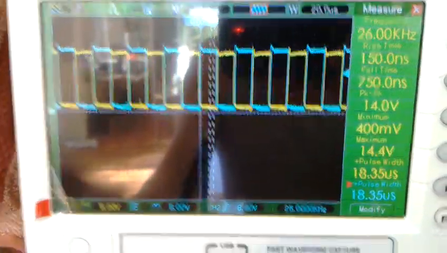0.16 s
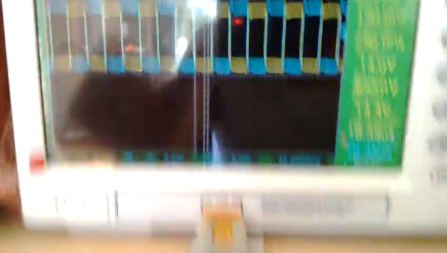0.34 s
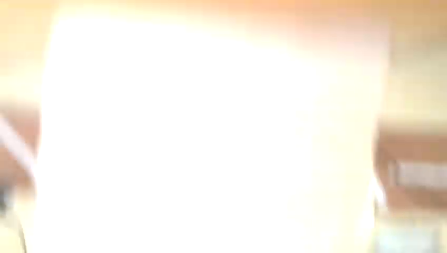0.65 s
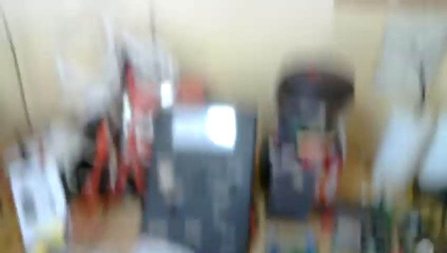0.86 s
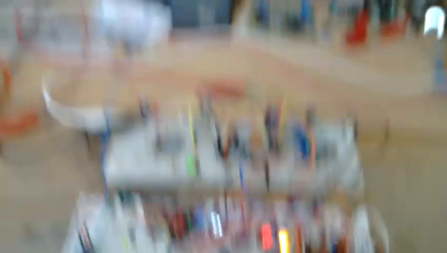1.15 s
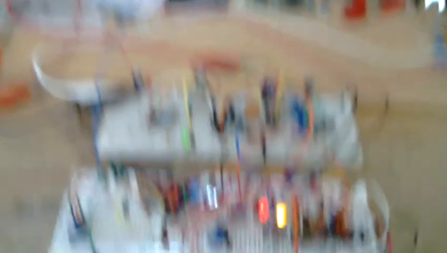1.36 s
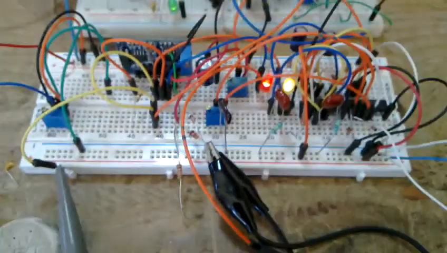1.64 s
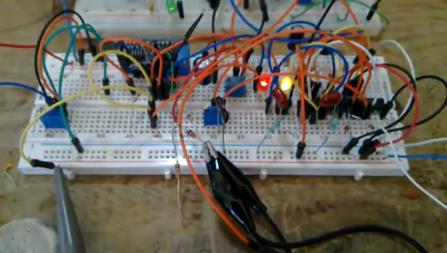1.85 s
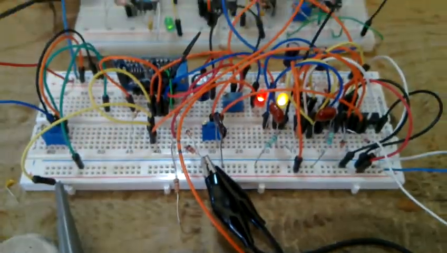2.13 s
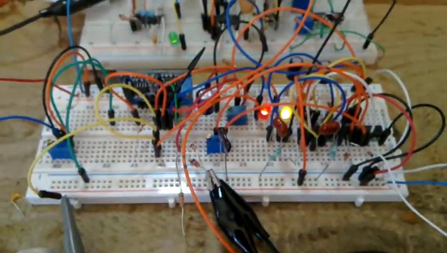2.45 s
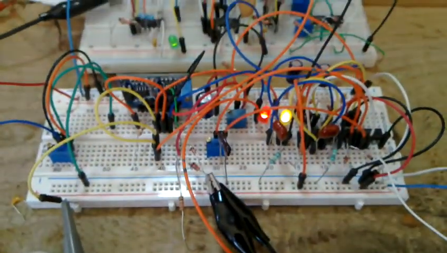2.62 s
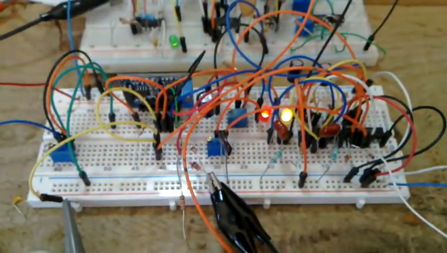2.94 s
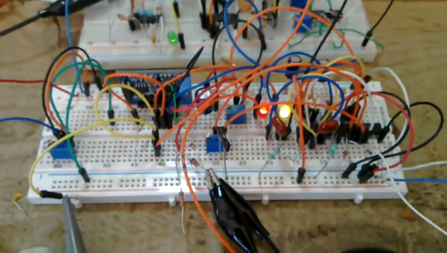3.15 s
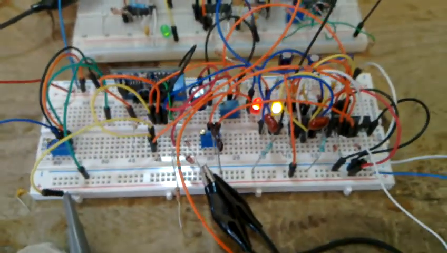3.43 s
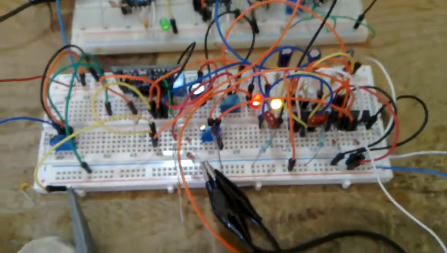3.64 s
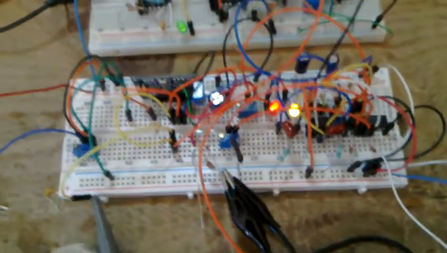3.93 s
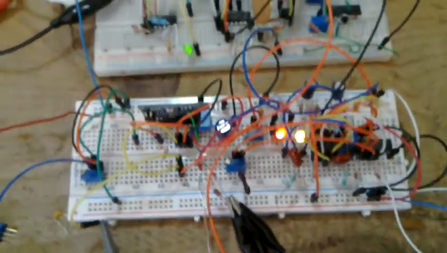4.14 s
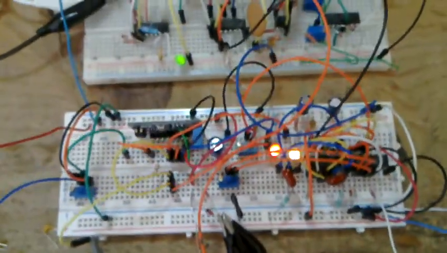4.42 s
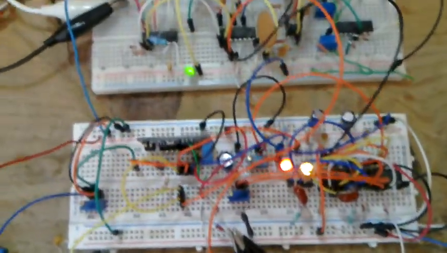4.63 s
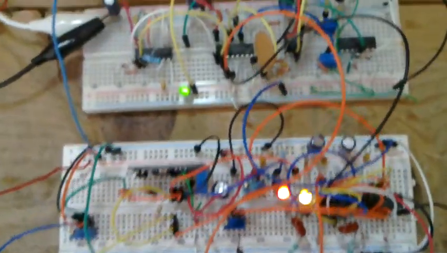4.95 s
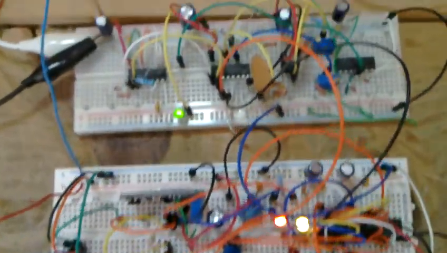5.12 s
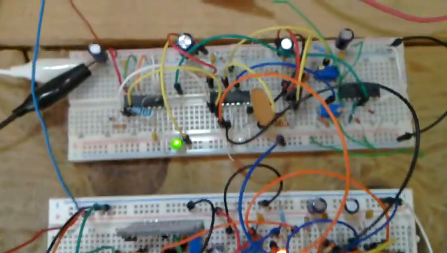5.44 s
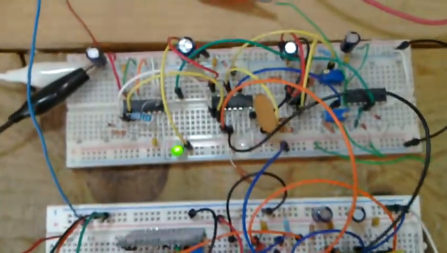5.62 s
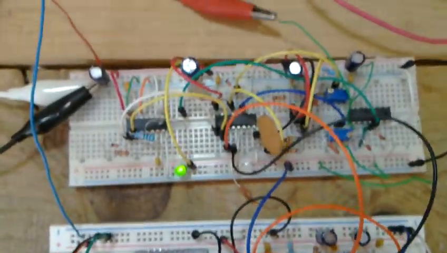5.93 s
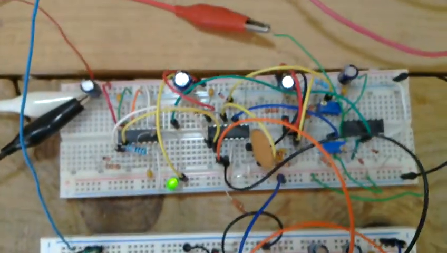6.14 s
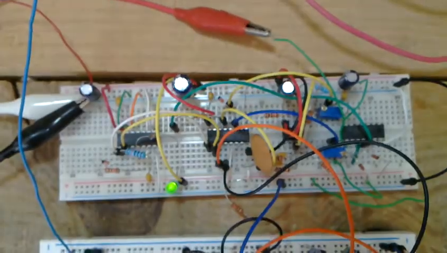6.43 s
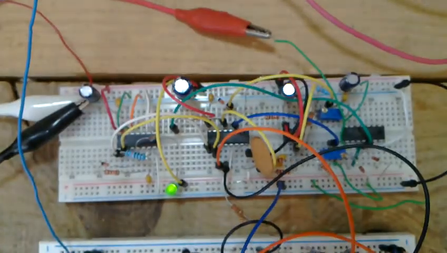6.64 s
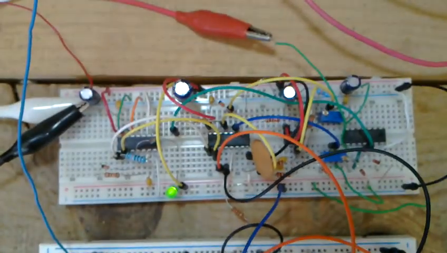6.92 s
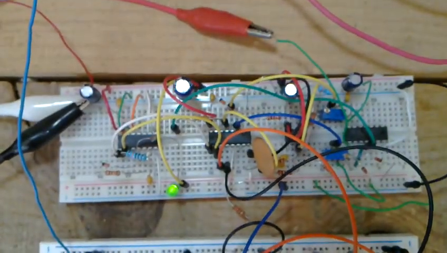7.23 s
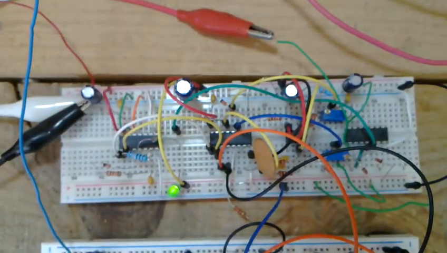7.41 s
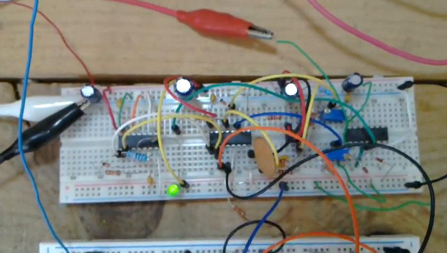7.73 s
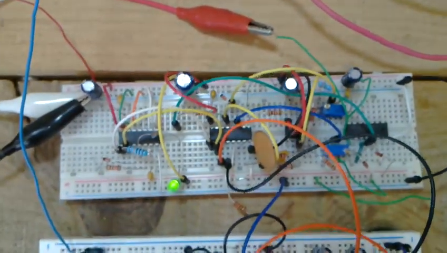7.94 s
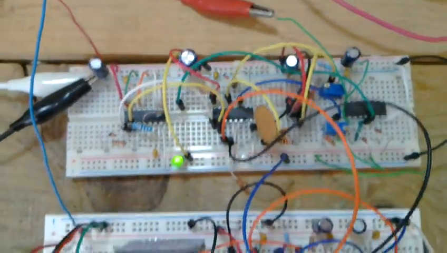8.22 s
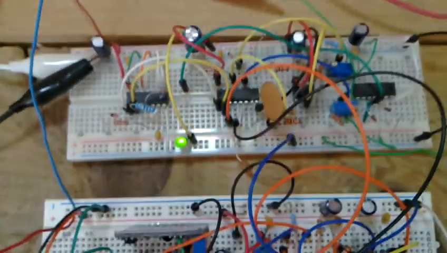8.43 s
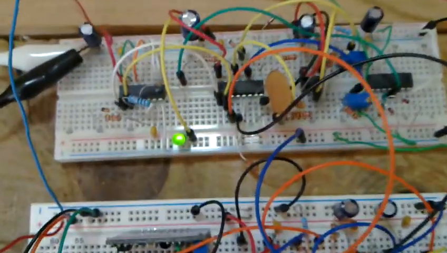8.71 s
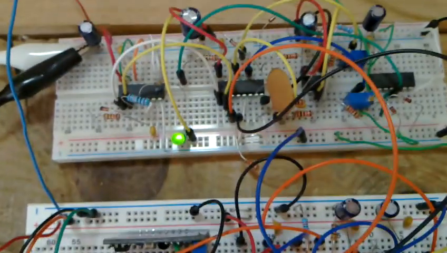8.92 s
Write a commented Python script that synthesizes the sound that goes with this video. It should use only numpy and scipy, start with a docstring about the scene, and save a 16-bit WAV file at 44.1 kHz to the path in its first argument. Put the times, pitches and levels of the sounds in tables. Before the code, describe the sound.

Low electrical-sounding fan drone in a quiet room, then louder whistling hiss with handling scuffs, a hard plastic click, and slowly shifting whine.

```python
"""An electronics bench: at the oscilloscope a small instrument fan hums, under even room air and faint tones. A
hand-held camera swings to the breadboards: the hiss jumps up, sleeve and case rustle, and the case clicks a few
times, sharpest at 1.3 s, then lightly again near 3.2 and 3.4 s. Then it drifts to the far board and moves in
close: fan partials swell and fade, faint ticks dot the treble. Hum and whine are harmonics of the blade rate in
standing waves; the hiss is coloured noise. A delayed copy of whine and hiss, the echo off the bench, sweeps a
comb through them."""
import sys
import numpy as np
from scipy import signal
from scipy.fft import rfft, irfft, next_fast_len
from scipy.io import wavfile
from scipy.ndimage import map_coordinates

SR = 44100
rng = np.random.default_rng(int(sys.argv[2]) if len(sys.argv) > 2 else 0)


def generate_wav(sig):
    """Save sig (samples, or channels by samples) to the path in sys.argv[1] as 16-bit PCM at SR."""
    pcm = np.round(np.clip(np.atleast_2d(sig).T, -1, 1) * 32767).astype(np.int16)
    wavfile.write(sys.argv[1], SR, pcm)


N = 399987
TIME = np.arange(N) / SR

# where the camera is: (time [s], place [0 oscilloscope, 1 near board, 2 far board, 3 close to the far board])
PLACE = [(.25, 0), (.75, 1), (4.0, 1), (6.0, 2), (7.6, 2), (8.7, 3)]


def gain_of(db):
    """Decibels to amplitude."""
    return 10 ** (np.asarray(db) / 20)


def evened(x):
    """Scales a sound to rms 1."""
    return x / np.sqrt(np.mean(x ** 2) + 1e-20)


def curves(rows, t=TIME):
    """Each column of a table after the first, joined by straight lines in time."""
    s, *columns = np.transpose(rows)
    return [np.interp(t, s, column) for column in columns]


def read(points, hz):
    """A spectrum in dB as gains, joined on a log-frequency axis."""
    f, db = np.transpose(points)
    return gain_of(np.interp(np.log(hz + 1), np.log(f), db))


def add(mix, s, sound):
    """Adds a sound at time s, cut off at the end of the mix."""
    part = mix[round(s * SR):][:len(sound)]
    part += sound[:len(part)]


def noise(shape, drive=1):
    """White noise, scaled by the drive, then coloured by shape(Hz); rms 1."""
    size = next_fast_len(N)
    spectrum = rfft(drive * rng.standard_normal(N), size)
    coloured = irfft(spectrum * shape(np.fft.rfftfreq(size, 1 / SR)), size)
    return evened(coloured[:N])


def wander(rate_hz):
    """A slow random curve of rms 1, with little above the rate."""
    t = np.arange(0, N / SR + 1, 1 / 2000)
    hz = np.fft.rfftfreq(len(t), t[1])
    spectrum = rfft(rng.standard_normal(len(t))) / np.sqrt(1 + (hz / rate_hz) ** 4)
    return np.interp(TIME, t, evened(irfft(spectrum, len(t))))


def swells(rows):
    """A smooth rise and fall for each row (time [s], length [s], peak level [dB])."""
    return sum(gain_of(db) * np.exp(-2 * ((TIME - s) / length) ** 2) for s, length, db in rows)


def standing_wave(order):
    """Gain of one harmonic as the camera passes its nodes and antinodes; 1 far from them."""
    # by multiple of the blade rate: (time [s], half-width [s], gain at the centre [dB, below 0 a node])
    crossings = {1: [(.52, 0.73, -29), (1.3, 0.6, 5.5), (4.85, 0.69, 4.5)], 2: [(1.2, 0.079, -3),
                 (5.35, 0.44, -10)], 3: [(.67, 0.056, -5), (.88, 0.4, 9.5), (1.14, 0.18, -30),
                 (3.85, 0.24, -11)], 4: [(.97, 0.16, -16), (1.05, 0.2, 7), (4.05, 0.23, 3),
                 (5.45, 0.15, 7.5)], 5: [(.68, 0.085, -10), (.95, 0.069, 5.5), (1.13, .15, -20),
                 (3, 0.26, 2.5), (3.85, .07, -4.5), (4.14, 0.16, -12), (4.92, 0.32, -3), (5.8, 0.44, 3.5)],
                 8: [(3.75, 0.42, -24)], 10: [(.55, 0.23, -14), (4.55, .3, 8.5), (5.15, 0.33, -12)],
                 15: [(.75, .2, 6.5), (1.12, 0.15, -12)], 18: [(8.97, .12, 16)]}
    gain = np.ones(N)
    for s, width_s, centre_db in crossings.get(order, []):
        away = ((TIME - s) / width_s) ** 2
        gain = gain * np.sqrt((gain_of(centre_db) ** 2 + away) / (1 + away))
    return gain


def partial(turns, order, eddies, flutter=0.0096, flutter_hz=15, eddy_db=0.15):
    """One harmonic of the blade rate in its standing wave; eddies at the intake shake the higher ones most."""
    angle = 2 * np.pi * (order * turns + rng.random())
    depth = flutter * order
    # independent flutter in phase and in quadrature blurs both level and pitch
    in_phase = (1 + depth * wander(flutter_hz)) * np.sin(angle)
    quadrature = depth * wander(flutter_hz) * np.cos(angle)
    shaken = (in_phase + quadrature) * gain_of(eddy_db * order * eddies)
    return standing_wave(order) * evened(shaken)


def fan_hum(turns, eddies, hum_db=0.67):
    """Blade harmonics with their own balance at each place, blended from one to the next."""
    # by multiple of the blade rate, before the hum_db trim and the standing waves:
    # (oscilloscope [dB], near board [dB], far board [dB], close to the far board [dB])
    hum_levels = {1: (-59.5, -54, -52.7, -53), 2: (-65, -68, -72.5, -70.5), 3: (-69, -61.5, -64.5, -61),
                  4: (-65, -57, -68.5, -61.5), 5: (-69.5, -53.5, -59, -56.5), 6: (-75, -72.5, -75.5, -75),
                  7: (-84, -76.5, -76, -73), 8: (-94, -71, -74.5, -66), 11: (-84, -73, -77, -78),
                  12: (-76, -76, -87, -82), 16: (-76, -82, -80, -81), 17: (-85, -83, -81, -86),
                  18: (-88, -96, -88, -86), 19: (-94, -87, -85, -90), 20: (-88, -79, -81, -85)}
    place, = curves(PLACE)
    hum = np.zeros(N)
    for order, levels in hum_levels.items():
        level_db = hum_db + np.interp(place, range(len(levels)), levels)
        hum += gain_of(level_db) * partial(turns, order, eddies)
    return hum


def fan_whine(turns, eddies):
    """Two high harmonics of the blade rate that sing out of the hiss."""
    # by multiple of the blade rate, against the hiss and before the standing waves:
    # (near board [dB], far board [dB], close to the far board [dB])
    whine_levels = {10: (-11, -4, -12.5), 15: (-8, -8.5, -7.5)}
    place, = curves(PLACE)
    whine = np.zeros(N)
    for order, levels in whine_levels.items():
        whine += gain_of(np.interp(place, (1, 2, 3), levels)) * partial(turns, order, eddies)
    return whine


def fan_hiss(eddies, eddy_db=1.0, rattle_db=1.5, rattle_hz=150):
    """Unsteady air through blades and grille: noise swelled by the eddies and a faster rattle, then coloured."""
    # colour of the hiss: (frequency [Hz], relative density [dB per Hz])
    hiss_colour = [(1200, -51), (2000, -23), (2700, -5.5), (3100, -4), (3500, -1), (3800, 1.5), (4300, 4),
                   (4850, 1), (5060, -7), (5700, -13), (6400, -22.5), (7100, -26), (9500, -28),
                   (15500, -27.5)]
    unsteady_db = eddy_db * eddies + rattle_db * wander(rattle_hz)
    return noise(lambda hz: read(hiss_colour, hz), gain_of(unsteady_db))


def over_bench(sound, rebound=0.13, dull_hz=6500):
    """Echoes off the bench, their top scattered by the clutter, make a comb that slides as the camera moves."""
    # from fan to microphone: (time [s], level of the hiss [dB], strength of the echo [0-1])
    path = [(0, -68.5, 0.5), (.35, -69, 0.9), (.62, -56.5, 0.1), (.82, -50.5, 0), (1.15, -57.5, .3),
            (1.5, -55.5, 0.5), (3.2, -54.5, 0.4), (3.55, -54, 0.4), (3.9, -56, 0.3), (4.3, -63, 0.26),
            (4.8, -57.5, 0.52), (5.3, -53, 0.74), (6.1, -54, 0.9), (8.2, -53.5, 0.5), (9.07, -55, 0.43)]
    # how much later the echo arrives: (time [s], delay [ms])
    echo_delay = [(.62, .2), (1.15, .9), (1.45, .915), (1.8, .872), (3.25, .878), (3.55, .94), (4.3, 1.085),
                  (5.2, 1.065), (6.1, 1.026), (8.2, 1.028), (8.65, .94), (9.07, .92)]
    level_db, echo = curves(path)
    delay_ms, = curves(echo_delay)
    lag = delay_ms * SR / 1000  # in samples
    dull = signal.sosfiltfilt(signal.butter(4, dull_hz, fs=SR, output="sos"), sound)
    # the second bounce, between camera and bench, narrows the peaks of the comb
    bounces = [echo, rebound * echo]
    echoes = np.zeros(N)
    for count, gain in enumerate(bounces, 1):
        echoes += gain * map_coordinates(dull, [np.arange(N) - count * lag], order=3)
    # scaled down as the echo gets stronger, to keep the level about even
    power = 1 + sum(gain ** 2 for gain in bounces)
    return gain_of(level_db) * (sound + echoes) / np.sqrt(power)


def room_air(air_db=-58, opening_db=-3, drift_db=0.83, drift_hz=31):
    """Even background, a little quieter at the start; a hollow band of air early on, a low drone by the far board."""
    # room air and microphone hiss: (frequency [Hz], relative density [dB per Hz])
    air_colour = [(15, -13), (55, -11.5), (150, -11), (290, -3), (450, -5.5), (900, 0), (1700, 0),
                  (2200, 1), (2700, -8.5), (4500, -3.5), (5600, -9), (7000, -20.5), (9500, -24),
                  (15500, -19)]
    vent_hz, vent_width_hz, vent_db = 590, 80, -67
    drone_hz, drone_width_hz, drone_db = 115, 25, -81
    place, = curves(PLACE)
    level_db = air_db + opening_db * np.maximum(1 - place, 0)
    air = noise(lambda hz: read(air_colour, hz)) * gain_of(level_db + drift_db * wander(drift_hz))
    vent = noise(lambda hz: 1 / (1 + ((hz - vent_hz) / vent_width_hz) ** 2))
    vent = vent * swells([(.3, .7, vent_db)])
    drone = noise(lambda hz: 1 / (1 + ((hz - drone_hz) / drone_width_hz) ** 2))
    drone = drone * gain_of(drone_db) * np.clip(place - 1, 0, 1)
    return air + vent + drone


def other_gear(waver=0.34, waver_hz=4.2):
    """Mains hum and faint steady tones of the other gear, each a sine whose phase wavers (in radians)."""
    # pitch of each tone: (frequency [Hz])
    tone_pitches = (60, 104, 120, 240, 586.5, 801, 1087.4, 1372.3, 1602, 8156, 8542.5, 9318)
    # a row for each pitch: (rms level over the near board [dB], over the far board [dB])
    tone_levels = [(-87.5, -88), (-102, -91), (-100, -89), (-88, -83), (-78, -94), (-76, -78.5), (-92, -73),
                   (-84, -76), (-73, -75), (-95, -97), (-91, -96), (-92, -96)]
    place, = curves(PLACE)
    gear = np.zeros(N)
    for hz, levels in zip(tone_pitches, tone_levels):
        tone = np.sqrt(2) * np.sin(2 * np.pi * hz * TIME + waver * wander(waver_hz))
        gear += gain_of(np.interp(place, (1, 2), levels)) * tone
    return gear


def handling(grain_db=3.0, grain_hz=300, bump_hz=190):
    """Grainy rubbing noise and low bumps carried through the camera's body."""
    # sleeve and grip rubbing as the camera swings: (time [s], length [s], level [dB])
    rustles = [(.782, 0.018, -48.5), (.822, 0.04, -50), (.945, 0.062, -52.5), (.98, 0.14, -67),
               (1.11, .07, -55), (1.28, 0.05, -55), (1.34, 0.07, -50)]
    # colour of the rubbing: (frequency [Hz], relative density [dB per Hz])
    rub_colour = [(100, -40), (350, -10), (600, -5), (1200, -5), (1800, 2), (2600, -7), (3400, 5),
                  (4600, 1), (6000, -9), (9000, -18.5), (15500, -26)]
    # soft bumps of the hand: (time [s], length [s], level [dB])
    bumps = [(.84, .05, -70), (3.515, .025, -69)]
    rub = noise(lambda hz: read(rub_colour, hz))
    rub = evened(rub * gain_of(grain_db * wander(grain_hz)))
    thud = noise(lambda hz: hz / (30 + hz) / (bump_hz ** 3 + hz ** 3))
    return rub * swells(rustles) + thud * swells(bumps)


def snap(size=1024):
    """A causal, minimum-phase pulse of peak 1 with the colour of a plastic contact."""
    # colour of the snap: (frequency [Hz], relative level [dB])
    snap_colour = [(100, -35), (400, 6), (2000, 16.5), (3500, 12), (4200, -1), (5500, 9), (6300, -8),
                   (7600, -2), (9000, -25), (11200, -8), (15500, -53)]
    log_gain = np.log(read(snap_colour, abs(np.fft.fftfreq(size, 1 / SR))))
    # the Hilbert transform of the log gain gives the phase that starts the pulse at once
    pulse = np.fft.ifft(np.exp(signal.hilbert(log_gain).conj())).real[:size // 2]
    return pulse / abs(pulse).max()


def clicks():
    """Each contact snaps and briefly rings the well-damped case, which is too small to radiate bass."""
    # clicks of the camera's case, before the bass cut: (time [s], snap level [dB], body level [dB])
    contacts = [(.7715, -37, -54), (.8203, -29, -43), (.8215, -30, -50), (.8248, -34, -54),
                (1.3011, -33, -40), (1.3017, -24.5, -20.5), (3.1545, -36, -68), (3.158, -40, -68),
                (3.4295, -37, -64), (3.4315, -38, -64)]
    # what the case rings with: (frequency [Hz], relative level [dB], t60 [s])
    case_modes = [(1020, -5, .005), (1270, 0, .0055), (3480, -15, .006)]
    t = np.arange(SR // 20) / SR
    ring = sum(gain_of(db - 60 * t / t60) * np.sin(2 * np.pi * hz * t) for hz, db, t60 in case_modes)
    pulse = snap()
    out = np.zeros(N)
    for s, snap_db, body_db in contacts:
        add(out, s, gain_of(snap_db) * pulse)
        add(out, s, gain_of(body_db) * ring)
    bass_cut = signal.butter(3, 500, "highpass", fs=SR, output="sos")
    return signal.sosfilt(bass_cut, out)


def faint_ticks(tick_t60=.02):
    """Each tick is a short puff of treble: decaying noise (t60 in s) through a band-pass."""
    # very faint ticks: (time [s], peak level [dB])
    tick_times = [(2.3768, -60), (2.8478, -57), (3.1536, -53), (3.3187, -62), (3.4289, -59), (3.7896, -59),
                  (4.7814, -61), (5.2019, -57), (5.6723, -60), (6.1433, -60), (7.5556, -61), (7.8599, -60),
                  (8.4969, -59), (8.9679, -60)]
    t = np.arange(SR // 40) / SR
    band = signal.butter(2, [6800, 9500], "bandpass", fs=SR, output="sos")
    out = np.zeros(N)
    for s, db in tick_times:
        grain = signal.sosfilt(band, rng.standard_normal(len(t)) * gain_of(-60 * t / tick_t60))
        add(out, s, gain_of(db) * grain / abs(grain).max())
    return out


def scene(eddy_hz=22, jitter=0.00043, jitter_hz=5.7):
    """Everything at one microphone; the same eddies swell the fan's hum, its whine and its hiss."""
    # rate at which the blades pass, before the jitter: (time [s], rate [Hz])
    blade_rate = [(0, 322.59), (0.6, 321.48), (1.2, 320.41), (2.2, 320.6), (3, 321.63), (3.7, 321.7),
                  (4.6, 320.39), (5.3, 320.53), (6.3, 321.97), (8, 322.13), (8.7, 322.69), (9.07, 322.92)]
    eddies = wander(eddy_hz)
    blade_hz, = curves(blade_rate)
    # blade passes so far, the shared phase of all the fan's harmonics
    turns = np.cumsum(blade_hz * (1 + jitter * wander(jitter_hz))) / SR
    hum = fan_hum(turns, eddies)
    airborne = over_bench(fan_whine(turns, eddies) + fan_hiss(eddies))
    background = room_air() + other_gear()
    return (hum + airborne + background + handling() + clicks() + faint_ticks())[None]


def record(dry, edge_hz=15800):
    """The recorder's band limit: a steep low-pass without delay."""
    low_pass = signal.firwin(801, edge_hz, window=("kaiser", 9), fs=SR)
    return signal.oaconvolve(dry, low_pass[None], "same")


dry = scene()
out = record(dry)
generate_wav(out)
```